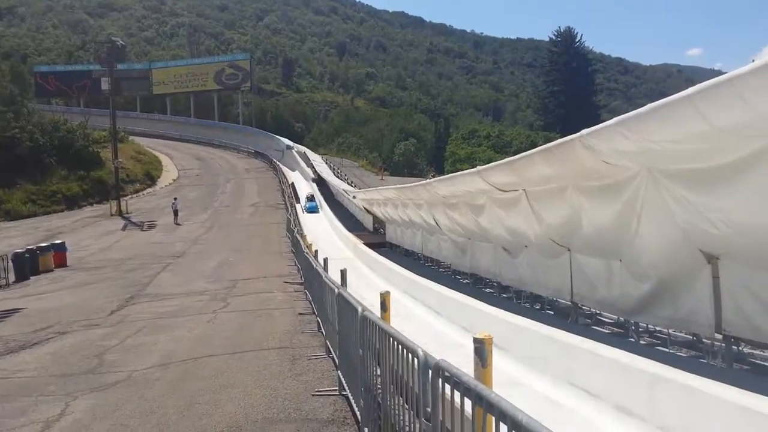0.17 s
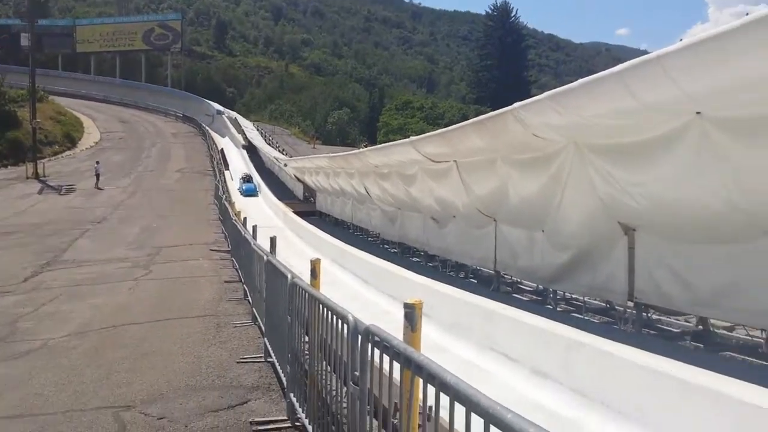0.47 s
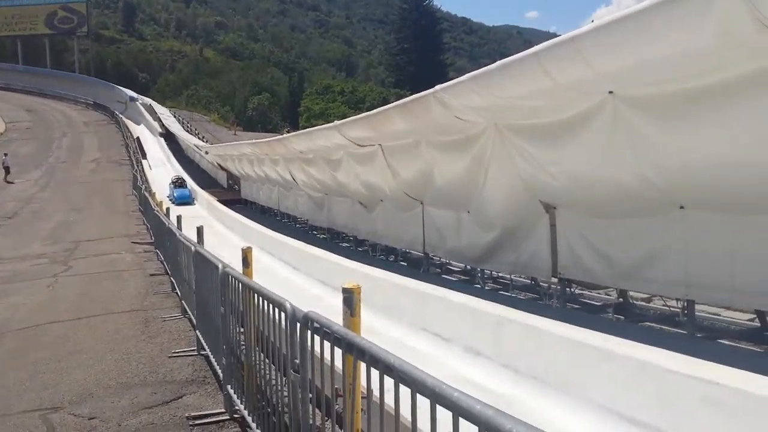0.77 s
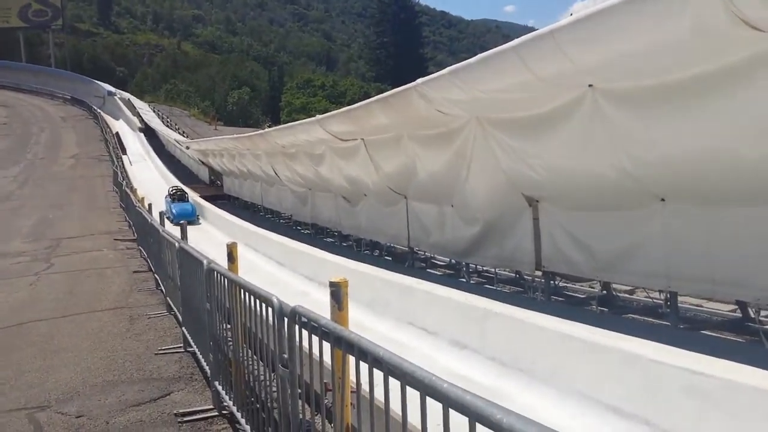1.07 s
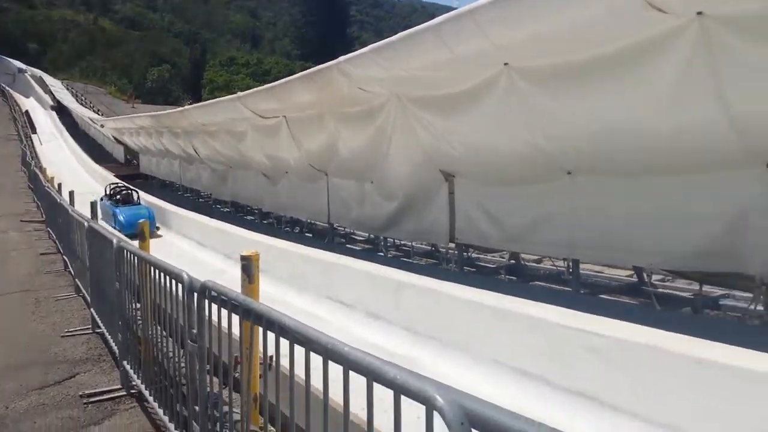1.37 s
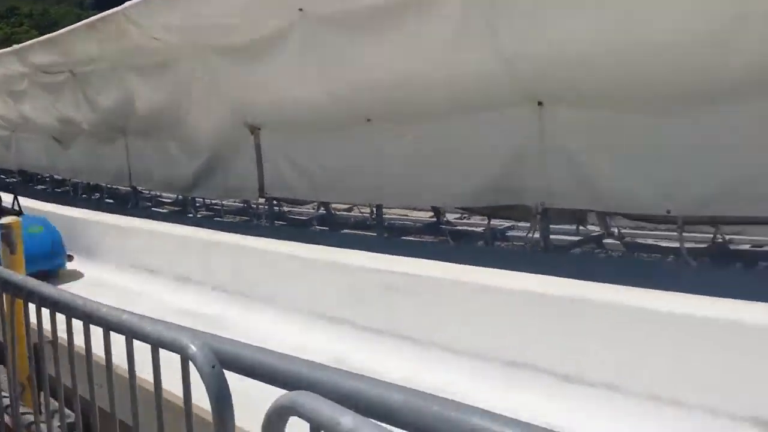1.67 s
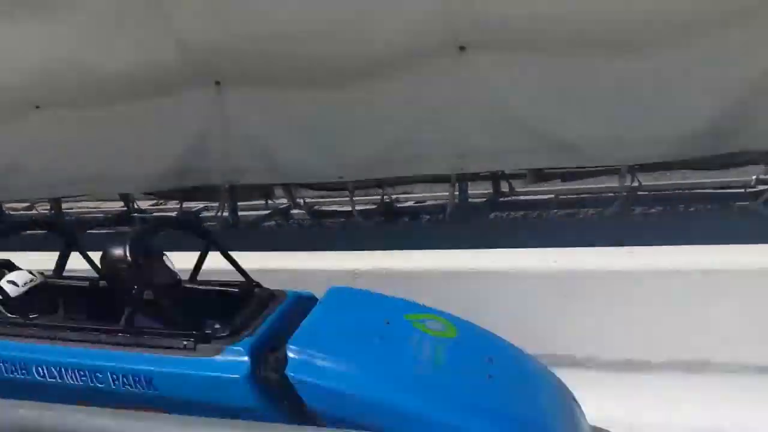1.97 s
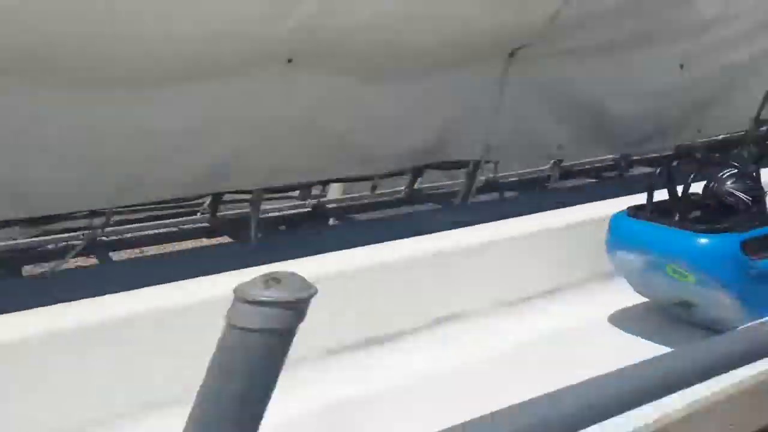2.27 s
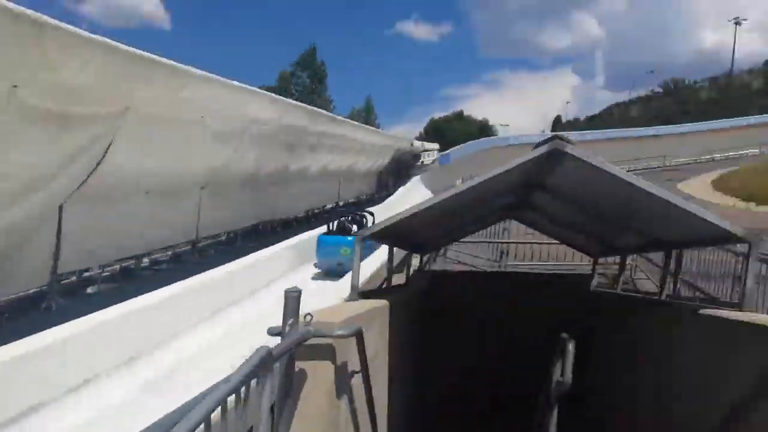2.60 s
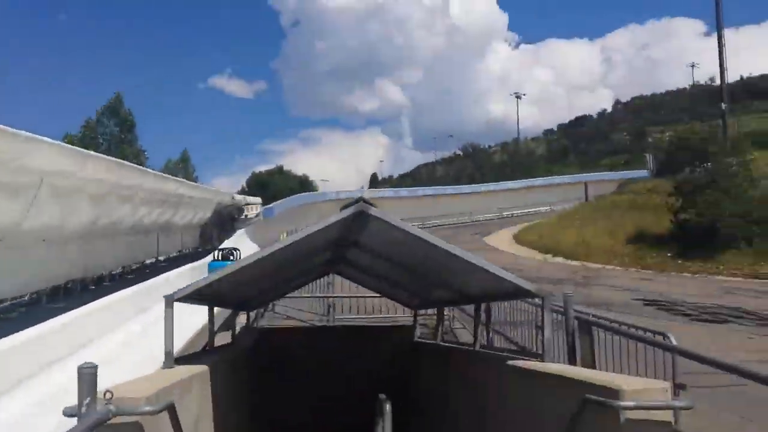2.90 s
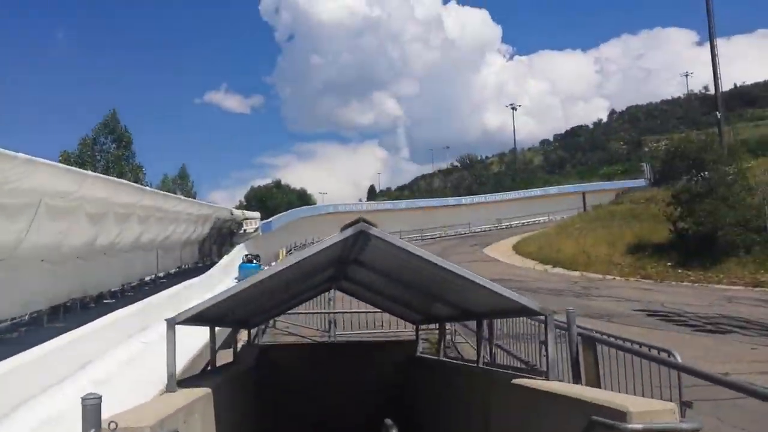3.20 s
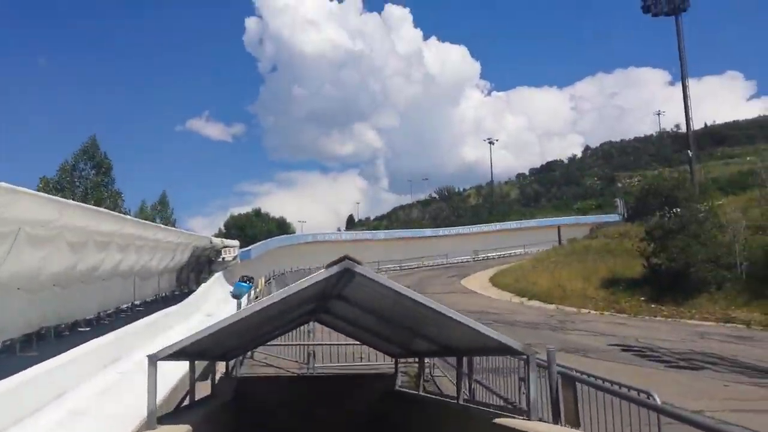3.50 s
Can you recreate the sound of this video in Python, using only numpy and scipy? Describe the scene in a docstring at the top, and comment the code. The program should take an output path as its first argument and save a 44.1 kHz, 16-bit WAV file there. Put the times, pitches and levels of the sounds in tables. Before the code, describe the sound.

A wheeled bobsled roars down a concrete track, booming past close by and fading away.

```python
"""A boom and a juddering roar swell, pass close by at about 2.1 s and fade: a wheeled bobsled on concrete.
The hull booms as noise through a resonance that sinks until 2.3 s and then climbs a little.
The wheels roar, grind and hiss as three bands of noise, shaken together by one judder.
Bumps ring the hull as decaying sines, scrapes swell the grind and hiss, and resonances sing faintly.
The track walls throw the wheels' treble back as short, scattered echoes."""
import sys
import numpy as np
from scipy import signal
from scipy.fft import rfft, irfft
from scipy.io import wavfile
from scipy.ndimage import uniform_filter1d

SR = 44100
rng = np.random.default_rng(int(sys.argv[2]) if len(sys.argv) > 2 else 0)


def dump_mix(stems):
    """Bounce the given channels to the path in sys.argv[1] as a 16-bit WAV at rate SR."""
    frames = np.atleast_2d(stems).T  # one column per channel
    limited = np.clip(frames, -1, 1)  # hard clip at full scale
    pcm = np.round(limited * 32767).astype(np.int16)
    wavfile.write(sys.argv[1], SR, pcm)


N = 160965
TIME = np.arange(N) / SR
FRAME_S = np.arange(N // 512 + 5) * 512 / SR  # noise is coloured in overlapping frames
BIN_HZ = np.fft.rfftfreq(2048, 1 / SR)
PASS_S, PASS_WIDTH_S = 2.25, 0.59  # middle of the change from coming to going, and its slowness


def amp(db):
    """Decibels to gain."""
    return 10 ** (np.asarray(db) / 20)


def unit(x):
    """Scales to rms 1."""
    return x / np.sqrt(np.mean(x ** 2) + 1e-20)


def curve(rows, t=TIME):
    """Every column of a time table, joined by straight lines."""
    s, *columns = np.transpose(rows)
    return [np.interp(t, s, c) for c in columns]


def read(rows, hz=BIN_HZ):
    """Every column of a frequency table, on a log axis."""
    f, *columns = np.transpose(rows)
    return np.array([np.interp(np.log(hz + 1), np.log(f + 1), c) for c in columns])


def band(rows, hz=BIN_HZ):
    """A spectrum in dB that falls a further 24 dB per octave beyond its ends."""
    below, above = rows[0][0] / (hz + 1), hz / rows[-1][0]
    octaves_out = np.log2(np.maximum(1, np.maximum(below, above)))
    return read(rows, hz)[0] - 24 * octaves_out


def passing(coming, going, hz=BIN_HZ[None], turn_s=PASS_S):
    """Blends two frequency tables as the sled goes by."""
    gone = .5 + .5 * np.tanh((FRAME_S[:, None] - turn_s) / PASS_WIDTH_S)
    return read(coming, hz) * (1 - gone) + read(going, hz) * gone


def wobble(low_hz, high_hz):
    """Random motion of rms 1, mostly between two rates."""
    f = np.fft.rfftfreq(N, 1 / SR) + 1e-6
    spectrum = rfft(rng.standard_normal(N))
    return unit(irfft(spectrum / (1 + (low_hz / f) ** 4) / (1 + (f / high_hz) ** 4), N))


def noise(colour_db):
    """Coloured noise of rms 1 at two microphone ports, which hear it less alike in the treble."""
    # likeness of the two ports: (frequency [Hz], likeness [0 to 1])
    likeness = [(60, .999), (250, 0.98), (550, 0.96), (1000, 1), (1800, 0.5), (3000, 0.27), (4300, 0.15),
                (5600, 0.25), (7500, 0.35), (14000, 0.079)]
    # stereo image, coming and going: (frequency [Hz], left minus right [dB], left lag [rad])
    ports_coming = [(100, 0.3, 0.018), (696, 1.5, 0.068), (1410, 2, 0.92), (1960, -5, 0.63),
                    (2780, 3, 0.18), (4250, 5.5, 0.68), (5360, 8, 4.14), (8150, -6.5, 2.74),
                    (14000, 1.5, 6.7)]
    ports_going = [(100, 0.8, 0.018), (700, 0.5, 0.49), (1340, -0.5, 1.42), (1910, -5, 2.1),
                   (2900, 2, 0.62), (3670, 7, 3.6), (6160, 2.5, 4.9), (7600, -11, 16), (13800, -2, 7.2)]
    a, b, c, d = rng.standard_normal((4, len(FRAME_S), len(BIN_HZ)))
    same = np.clip(read(likeness)[0], 0, 1)
    balance_db, lag = passing(ports_coming, ports_going)
    left = a + 1j * b
    right = (same * left + np.sqrt(1 - same ** 2) * (c + 1j * d)) * np.exp(1j * lag)
    frames = np.array([left * amp(balance_db / 2), right * amp(-balance_db / 2)]) * amp(colour_db)
    sound = signal.istft(frames.swapaxes(1, 2), nperseg=2048, noverlap=1536)[1]
    return unit(sound[:, :N])


def walls(x):
    """Short, scattered echoes off the concrete, of the treble only."""
    wall_db, t60_s, echoes_per_s = -11, 0.1, 2000
    t = TIME[:SR // 3]
    hits = rng.standard_normal((2, len(t))) * (rng.random(len(t)) < echoes_per_s / SR)
    taps = hits * amp(-60 * t / t60_s)
    treble = signal.sosfilt(signal.butter(2, 900, "high", fs=SR, output="sos"), x)
    return amp(wall_db) * signal.fftconvolve(treble, taps / np.linalg.norm(taps[0]), axes=1)[:, :N]


def ring():
    """Narrow resonances of the sled sing now and then, each a tone blurred by slow random motion."""
    # the singing: (time of the peak [s], pitch [Hz], level [dB], time from peak to 1/e [s])
    songs = [(1.66, 943, -33.5, 0.065), (3.05, 1566, -43, .42), (3.09, 1550, -39, .02)]
    width_hz = 44
    out = np.zeros(N)
    for peak_s, hz, db, length_s in songs:
        fuzz = wobble(1, width_hz) + 1j * wobble(1, width_hz)
        tone = (fuzz * np.exp(2j * np.pi * hz * TIME)).real
        out += amp(db) * np.exp(-((TIME - peak_s) / length_s) ** 2) * tone
    return out


def kicks(per_s, decay_s):
    """Small random knocks that jump up and die away, as a level of mean 0 and rms 1."""
    hits = rng.random(N) < per_s / SR
    trail = signal.lfilter([1], [1, -np.exp(-1 / (decay_s * SR))], hits)
    level = np.tanh(.5 * trail)  # crowded knocks saturate
    return unit(level - level.mean())


def patches(depth_db):
    """Random swells in small patches of time and pitch, as the surface under the wheels changes."""
    field = rng.standard_normal((len(FRAME_S), len(BIN_HZ)))
    smooth = uniform_filter1d(uniform_filter1d(field, size=4, axis=0), size=24, axis=1)
    return depth_db * unit(smooth)


def scrapes():
    """Power that harder scrapes add to grind and hiss: each rises and dies, rasping with quick slips."""
    # the scrapes: (start [s], level [dB], time until it dies away [s], hiss relative to grind [dB])
    scrape_rows = [(0.531, -20.5, 0.0084, -35), (0.568, -21, 0.012, -36), (0.784, -24, 0.038, -24),
                   (1.132, -12.5, .015, -28), (1.163, -23, .01, -28), (1.219, -21.5, 0.018, -27),
                   (2.127, -19, 0.014, -7), (2.22, -30, 0.02, 4), (2.279, -19, 0.024, -10),
                   (2.388, -21.5, 0.019, -3), (2.45, -30.5, 0.031, 2), (2.608, -26.5, 0.03, -10)]
    rise_s, decay_s = .01, 0.014
    rasp_per_s, rasp_decay_s, rasp_db = 170, 0.0044, 1.4
    grind, hiss = np.zeros(N), np.zeros(N)
    for start, db, length, bright_db in scrape_rows:
        t = np.maximum(TIME - start, 0)
        level = amp(db) * np.minimum(t / rise_s, 1) * np.exp(-np.maximum(t - length, 0) / decay_s)
        grind += level ** 2
        hiss += (level * amp(bright_db)) ** 2
    rasp = amp(rasp_db * kicks(rasp_per_s, rasp_decay_s)) ** 2
    return grind * rasp, hiss * rasp


def wheels(roar_db=0, grind_db=3.0, hiss_db=5.0, fizz_db=2):
    """Roar, grind and hiss share one judder; the grind and hiss also share a fast, gritty crackle."""
    # rolling noise before trim: (time [s], roar [dB], grind [dB], hiss [dB])
    roll = [(0.09, -41, -50, -66), (0.15, -27.5, -37.5, -59), (0.35, -24, -27, -41.5),
            (0.47, -20, -29, -48), (1.14, -23.5, -25.5, -39.5),  (1.19, -38, -31, -44.5),
            (1.24, -31.5, -26, -41.5), (1.37, -32.5, -28, -38.5), (1.86, -19.5, -23.5, -39.5),
            (2.16, -23.5, -26, -37.5), (2.31, -23.5, -23, -29.5), (2.49, -26.5, -28.5, -40.5),
            (2.51, -30, -30, -38.5), (2.78, -31, -32.5, -43), (2.82, -27, -27.5, -41),
            (2.98, -33, -34, -48), (3.63, -35.5, -38, -55.5)]
    # highest treble before trim: (time [s], level [dB])
    fizz = [(0.09, -88), (0.18, -76), (1.13, -53.5), (1.47, -44), (2.41, -41.5), (3.63, -68.5)]
    # spectra of the roar, grind, hiss and highest treble: (frequency [Hz], density [dB per Hz])
    roar_coming = [(310, -43), (370, -12.5), (415, 2.5), (525, 1.5), (620, -18.5), (730, -36), (880, -10.5),
                   (1100, -26), (1600, -66)]
    roar_going = [(220, 0), (330, -6.5), (405, -3.5), (510, -1.5), (620, -5), (730, -12.5), (860, -5),
                  (1100, -19), (1600, -57)]
    grind_coming = [(600, 6.5), (1050, -2), (1450, -1.5), (2100, -1), (3300, 1.5), (4100, 0), (5000, -3),
                    (5900, -18), (8000, -59)]
    grind_going = [(600, -41), (1050, -2.5), (1450, 0.5), (2100, -0.5), (3000, -0.5), (4100, 2.5),
                   (5000, 1), (5900, -7.5), (8000, -35)]
    hiss_band = [(4000, -29), (5800, 2.5), (7000, -0.5), (8500, 0.5), (9800, -2), (11200, -15.5),
                 (13000, -71)]
    air_band = [(8000, -8), (11000, 3.5), (13000, -1), (15200, -6)]
    open_s = 1.38  # around here the roar comes to be heard directly and is fuller
    near_s, near_width_s, near_brighter = 1.855, 0.16, 0.15  # the grind reaches higher while close
    judder_low_hz, judder_high_hz, grit_hz = 12, 46, 352
    roar_judder_db, grind_judder_db, hiss_judder_db = 1.07, 0.85, 1.15
    grit_db, kick_db = -0.14, 1.4
    hiss_grit, hiss_flutter_db = 0.87, 0.72  # the hiss takes a share of the grit and flutters by itself

    roar, grind, hiss = curve(roll)
    judder = wobble(judder_low_hz, judder_high_hz)
    grit = grit_db * wobble(judder_high_hz, grit_hz) + kick_db * kicks(per_s=55, decay_s=0.007)
    scraped_grind, scraped_hiss = scrapes()

    roar_noise = noise(passing(roar_coming, roar_going, turn_s=open_s)[0])
    low = amp(roar + roar_db + roar_judder_db * judder) * roar_noise

    nearness = np.exp(-((FRAME_S[:, None] - near_s) / near_width_s) ** 2)
    tilted_hz = BIN_HZ / (1 + near_brighter * nearness)
    grind_colour = passing(grind_coming, grind_going, tilted_hz)[0] + patches(depth_db=1.26)
    grind_level = np.sqrt(amp(grind + grind_db) ** 2 + scraped_grind)
    middle = grind_level * amp(grind_judder_db * judder + grit) * noise(grind_colour)

    hiss_level = np.sqrt(amp(hiss + hiss_db) ** 2 + scraped_hiss)
    high = hiss_level * noise(band(hiss_band) + patches(depth_db=1.74))
    high = high + amp(curve(fizz)[0] + fizz_db) * noise(band(air_band))
    flutter = hiss_flutter_db * wobble(judder_high_hz / 2, judder_high_hz)
    return low + middle + high * amp(hiss_judder_db * judder + hiss_grit * grit + flutter)


def thumps():
    """Each bump rings the hull's low modes for a few cycles and gives it a brief, rough shudder."""
    # the bumps: (start [s], level [dB], pitch [Hz], decay of the lowest mode [s])
    bumps = [(0.438, 1, 162, 0.013), (0.61, -1, 151, 0.013), (1.202, 0.5, 127.6, 0.021),
             (2.09, -1.5, 109.3, 0.013), (2.794, -0.5, 93.5, 0.039), (2.872, -4.5, 91, .02),
             (3.135, -7, 91, 0.035), (3.235, -10, 92.5, 0.025)]
    # the hull's modes: (multiple of the pitch, level [dB])
    modes = [(1, -1.5), (1.5, -20), (2.1, -11.5)]
    # spectrum of the shudder: (frequency [Hz], level [dB])
    shudder = [(130, -13.5), (225, -16.5)]
    rise_s, shudder_db, shudder_decay_s = .002, -14, 0.019
    mode_damping = 1.1  # higher modes die faster, as this power of their multiple
    out, shake = np.zeros(N), np.zeros(N)
    for start, db, hz, decay in bumps:
        t = np.maximum(TIME - start, 0)
        blow = amp(db) * (1 - np.exp(-t / rise_s))
        for k, mode_db in modes:
            fading = np.exp(-t * k ** mode_damping / decay)
            out += blow * amp(mode_db) * fading * np.sin(2 * np.pi * hz * k * t)
        shake += blow * np.exp(-t / shudder_decay_s)
    return out + amp(shudder_db) * shake * noise(band(shudder))


def hull(trim_db=-1.0):
    """The shell booms with the shaking of the ride: noise through a main resonance of moving pitch."""
    # the boom before trim: (time [s], level [dB])
    boom = [(.09, -41), (.15, -30), (.43, -17.5), (.65, -15), (.98, -15), (1.27, -14), (1.45, -17.5),
            (1.7, -11), (2.05, -10.5), (2.45, -16.5), (2.68, -19), (2.9, -21), (3.25, -23.5), (3.63, -26.5)]
    # the main resonance: (time [s], centre [Hz])
    boom_pitch = [(.3, 164), (.65, 145), (1.3, 128), (1.8, 110), (2.3, 88), (3.2, 94), (3.6, 114)]
    # spectrum of the shell: (frequency [Hz], density [dB per Hz])
    shell = [(30, -25), (50, -37), (75, -0.5), (115, 0), (160, -3), (215, 1), (265, 0), (320, -7.5),
             (520, -33)]
    sharpness = 2.54  # Q of the main resonance
    ratio = (BIN_HZ + 1) / curve(boom_pitch, FRAME_S)[0][:, None]
    resonance_db = -10 * np.log10(1 + (sharpness * (ratio - 1 / ratio)) ** 2)
    return amp(curve(boom)[0] + trim_db) * noise(band(shell) + resonance_db)


def scene():
    """The whole sled with its echoes, rising quickly out of silence."""
    start_s, rise_s = 0.083, 0.0075
    rolling = wheels()
    swell = np.clip((TIME - start_s) / rise_s, 0, 1) ** 4
    return (walls(rolling) + ring() + rolling + thumps() + hull()) * swell


def record(dry):
    """The microphone's low cut, soft overload on the largest peaks, then the band limit."""
    low_cut_hz, ceiling, edge_hz = 48.6, .98, 15250
    cut = signal.sosfilt(signal.butter(4, low_cut_hz, "high", fs=SR, output="sos"), dry)
    held = cut / (1 + abs(cut / ceiling) ** 8) ** (1 / 8)
    band_limit = signal.firwin(511, edge_hz, window=("kaiser", 9), fs=SR)
    return signal.oaconvolve(held, band_limit[None], "same")


dry = scene()
out = record(dry)
dump_mix(out)
```